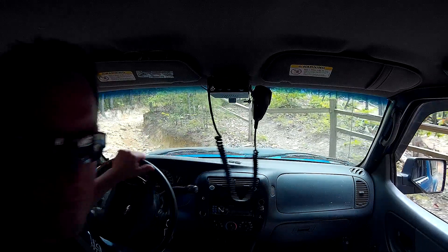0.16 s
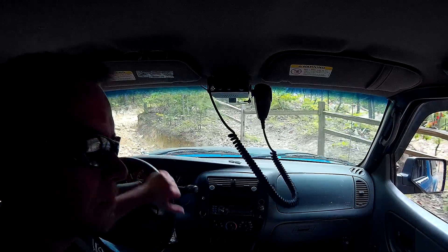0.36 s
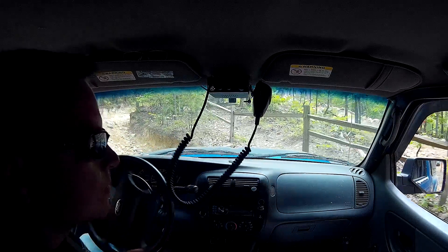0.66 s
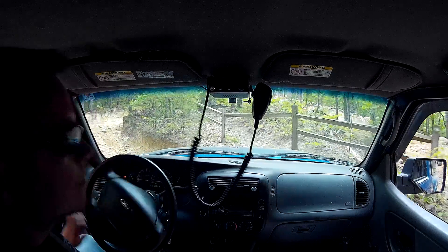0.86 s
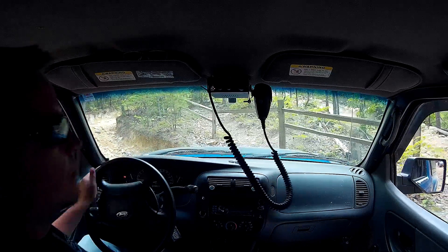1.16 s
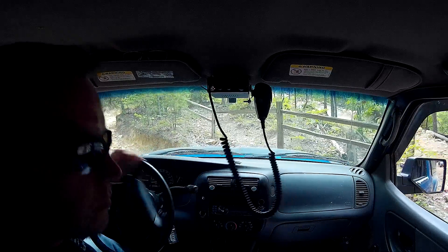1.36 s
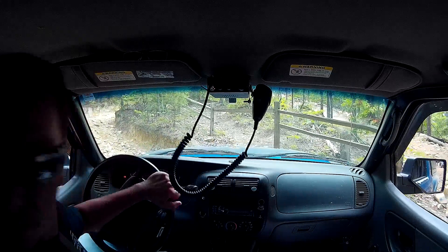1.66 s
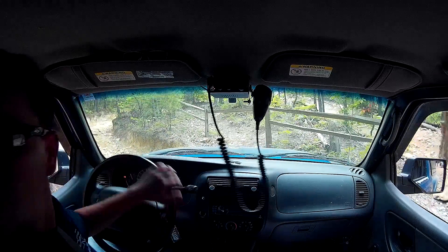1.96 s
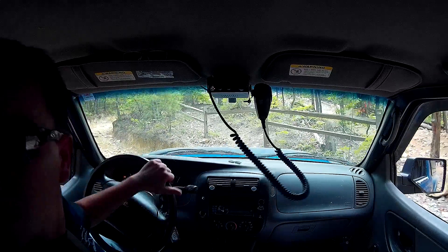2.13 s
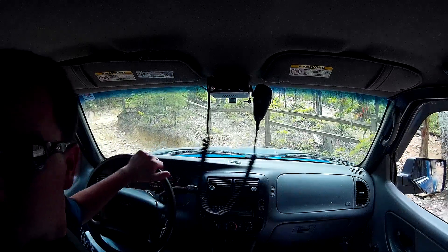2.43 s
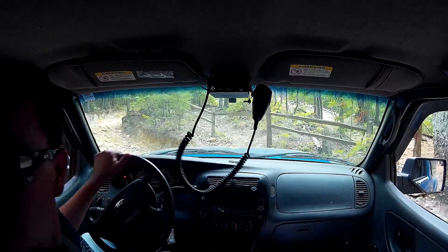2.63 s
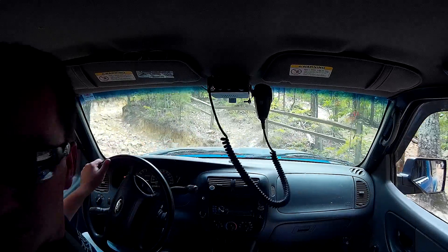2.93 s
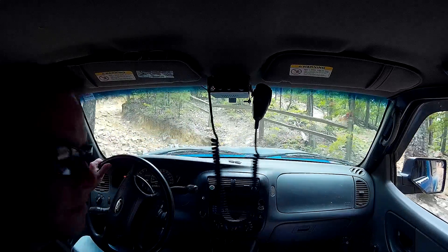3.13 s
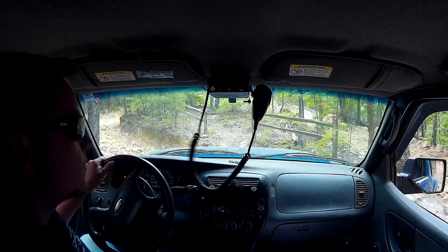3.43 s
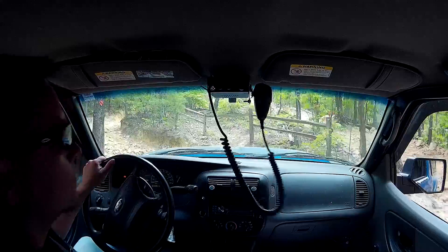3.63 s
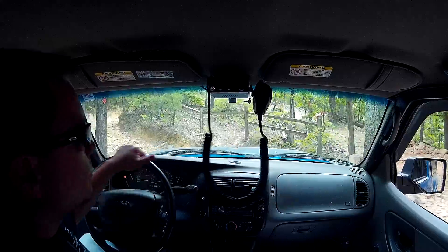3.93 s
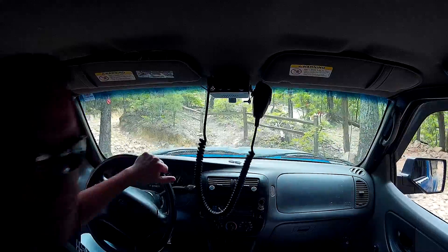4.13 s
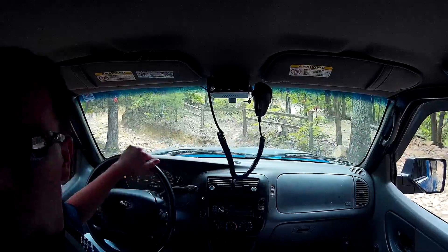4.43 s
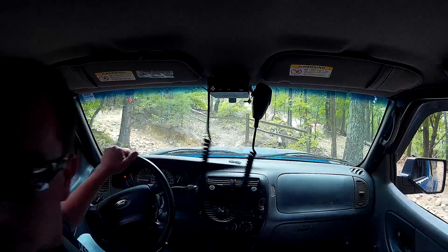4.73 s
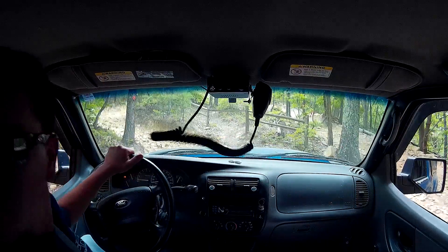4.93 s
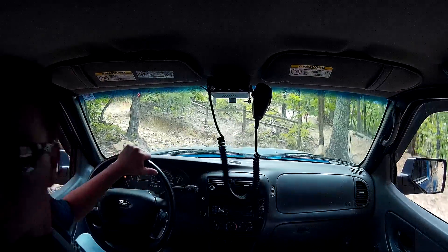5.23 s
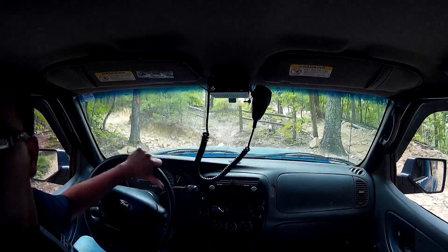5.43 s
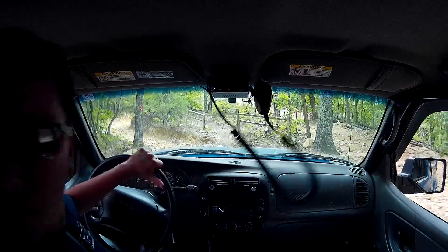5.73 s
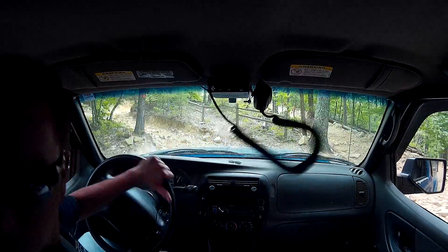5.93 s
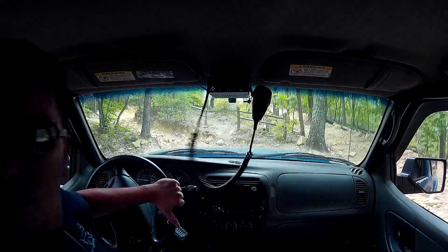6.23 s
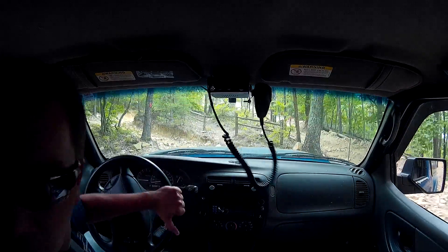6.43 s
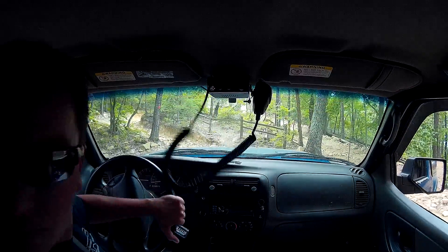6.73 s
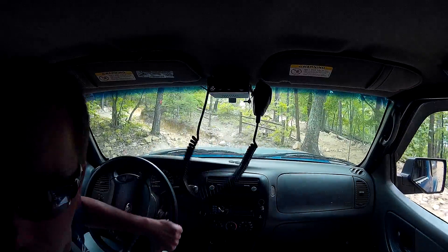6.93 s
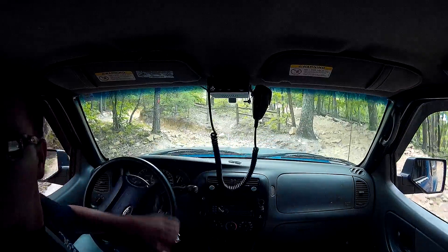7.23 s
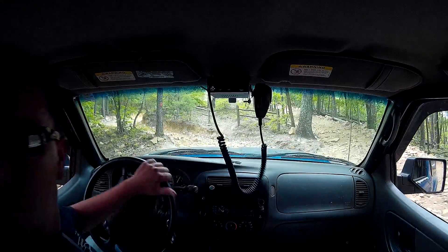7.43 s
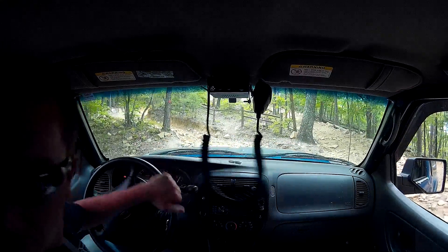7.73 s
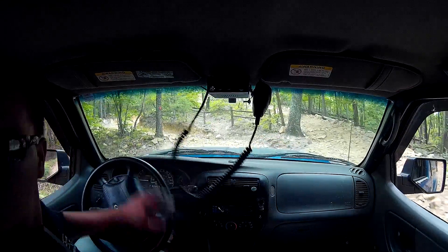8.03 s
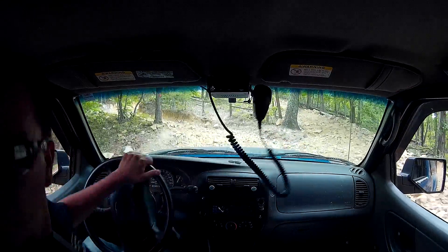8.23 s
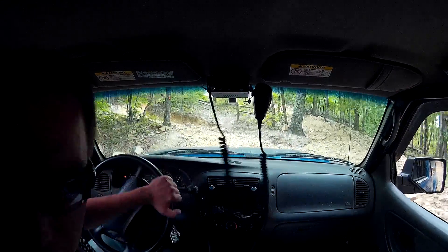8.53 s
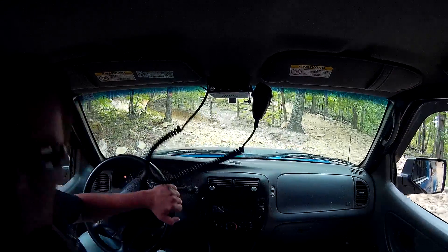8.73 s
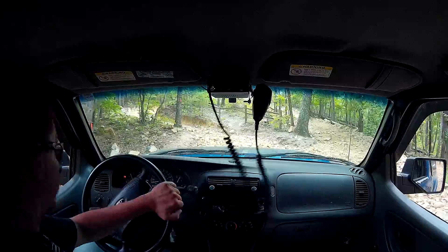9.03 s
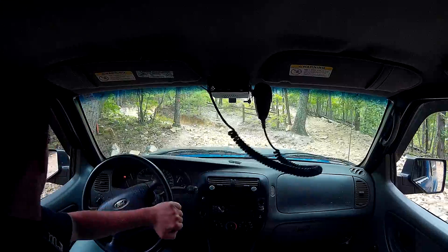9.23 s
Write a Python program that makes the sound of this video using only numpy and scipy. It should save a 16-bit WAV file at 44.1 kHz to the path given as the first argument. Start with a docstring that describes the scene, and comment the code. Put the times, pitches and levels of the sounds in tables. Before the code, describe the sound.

From a microphone inside a small truck cab: steady, humming engine at low revs, muffled gravel grinding in surges, and low body sway. Irregular hollow stone pops and boomy suspension knocks come through the floor, while crisp plastic ticks, snaps, small squeaks and a soft hiss sound nearer. Early seconds are milder; clusters of hard blows arrive midway and again late, then crunching continues to the end.

```python
"""A six-cylinder engine turns low and steady in the cab of a pickup crawling up a rocky trail.
Its drone is a stack of sines; under it filtered noise makes tyre rumble, body sway and grinding grit.
Stones pop and the suspension thumps as short dying rings. Loose trim clacks as filtered snaps,
a metal fitting jingles through its ringing tones, panels squeak in narrow bands of noise,
and a soft hiss carries fine ticks and a thin whistle."""
import sys
import numpy as np
from scipy import signal
from scipy.fft import rfft, irfft, next_fast_len
from scipy.io import wavfile
from scipy.ndimage import uniform_filter1d, minimum_filter1d, map_coordinates

SR = 44100
rng = np.random.default_rng(int(sys.argv[2]) if len(sys.argv) > 2 else 0)


def generate_wav(signal):
    """Clip the signal to [-1, 1] and save it as 16-bit WAV at the path in sys.argv[1]."""
    frames = np.transpose(np.atleast_2d(signal))
    scaled = np.clip(frames, -1, 1) * 32767
    pcm = np.round(scaled).astype(np.int16)
    wavfile.write(sys.argv[1], SR, pcm)


N = 413216  # length in samples
USUAL_LOAD_DB = -33.5  # grinding level on an ordinary stretch; load_db is counted from here


def amp(db):
    """Turn decibels into a gain."""
    return 10 ** (np.asarray(db) / 20)


def unit(x):
    """Scale to an rms of 1."""
    return x / np.sqrt(np.mean(x ** 2) + 1e-20)


def along(points, hz):
    """Read (pitch_hz, value) points at any pitch, on a log axis."""
    f, v = np.transpose(points)
    return np.interp(np.log(hz + 1), np.log(f + 1), v)


def curves(rows):
    """Turn each column after the time into a curve with one value per sample."""
    s, *cols = np.transpose(rows)
    return [np.interp(np.arange(N) / SR, s, c) for c in cols]


def wobble(rate):
    """A smooth random curve through `rate` random points a second."""
    points = rng.standard_normal(int(N * rate / SR) + 4)
    return map_coordinates(points, [np.arange(N) * rate / SR])


def coloured(x, spectrum):
    """Filter x to the given (pitch_hz, level_db) curve, with no sound before its cause."""
    m = 2 * next_fast_len(len(x))
    level = amp(along(spectrum, np.fft.rfftfreq(m, 1 / SR)))
    # folding the cepstrum forward gives the minimum-phase filter
    cepstrum = irfft(np.log(level))
    cepstrum[1:m // 2] *= 2
    cepstrum[m // 2 + 1:] = 0
    return irfft(rfft(x, m) * np.exp(rfft(cepstrum)))[:len(x)]


def add(track, s, sound):
    """Mix a sound into the track, starting at s seconds."""
    start = int(np.clip(s * SR, 0, N - 1))
    track[start:start + len(sound)] += sound[:N - start]


def contacts(rate, spread_db):
    """Random small blows of unequal size and either sign, `rate` a second; rms 1."""
    size = amp(spread_db * np.minimum(rng.standard_exponential(N), np.pi))
    return unit((rng.random(N) < rate / SR) * size * rng.choice([-1, 1], N))


# how long the cab's reflections last: pitch_hz, time_to_fall_60_db_s
CAB_REFLECTIONS = [(100, 0.1), (500, 0.038), (2000, 0.055), (12000, 0.035)]


def in_cab(sound, wet_db):
    """Walls throw a blow back as a short noisy tail that dies at its own pace in each band; peak 1."""
    hz, t, z = signal.stft(rng.standard_normal(SR // 6), SR, nperseg=128)
    decay = amp(-60 * t / along(CAB_REFLECTIONS, hz)[:, None])
    tail = signal.istft(z * decay, SR, nperseg=128)[1]
    tail = np.pad(tail / np.linalg.norm(tail), (SR // 500, 0))  # reflections come 2 ms late
    both = sound + amp(wet_db) * signal.fftconvolve(sound, tail)[:len(sound)]
    return both / np.max(np.abs(both))


# smooth trail between the rocks: grinding_db, tyre_rumble_db, body_sway_db
SMOOTH_TRAIL = (-43, -32.5, -41)
# a wheel climbs a rock and rolls off; rise and fall are times for a change by a factor e:
# crest_s, rise_s, fall_s, grinding_db, tyre_rumble_db, body_sway_db
ROCK_CLIMBS = [(0.291, 0.0306, 0.06, -43.5, -35, -22.5), (0.411, 0.071, 0.052, -33.5, -28.5, -36),
               (0.817, 0.083, 0.18, -29, -20, -19), (1.101, .07, 0.23, -34, -19.5, -26),
               (1.351, 0.097, 0.1, -35, -23.5, -39), (1.669, 0.41, 0.09, -36, -25.5, -27),
               (2.078, .05, 0.12, -33.5, -29, -26.5), (2.481, 0.12, 0.19, -32, -26.5, -24),
               (2.841, 0.06, 0.12, -33.5, -21, -22.5), (3.11, 0.21, 0.15, -30, -22, -24.5),
               (3.67, 0.2, 0.13, -24.5, -18.5, -15), (3.95, 0.058, 0.1, -33, -23, -26),
               (4.331, 0.0966, 0.38, -45.5, -28.5, -27), (4.809, 0.12, 0.13, -30.5, -21, -31),
               (5.009, 0.09, 0.54, -35.5, -23, -25.5), (5.412, .14, 0.086, -24, -19, -22),
               (5.62, 0.21, 0.063, -29, -18.5, -13), (5.861, 0.34, 0.12, -30, -18, -17),
               (6.281, 0.33, 0.17, -32.5, -23.5, -21), (6.539, 0.075, 0.13, -34, -29, -24.5),
               (7.05, 0.075, 0.13, -30, -32, -22.5), (7.331, .1, 0.13, -29, -24.5, -24.5),
               (7.741, 0.081, 0.097, -28.5, -28, -32), (8.11, 0.28, 0.19, -23.5, -15, -18.5),
               (8.42, 0.303, 0.057, -41, -47, -15), (8.721, 0.16, 0.25, -29, -22.5, -25),
               (8.85, 0.081, 0.027, -37, -44, -18), (9.32, 0.31, 0.16, -32, -24.5, -22.5)]
SWAY_LINGERS = 1.97  # the body settles this many times slower than the tyre


def ride():
    """Grinding, rumble and sway in dB: each rock swells and dies away on top of the smooth trail."""
    t = np.arange(0, N + 64, 64) / SR
    power = amp(SMOOTH_TRAIL)[:, None] ** 2 + 0 * t
    for s, rise, fall, *levels in ROCK_CLIMBS:
        settle = fall * np.array([[1], [1], [SWAY_LINGERS]])
        swell = np.exp(-np.maximum((s - t) / rise, (t - s) / settle))
        power = power + (amp(levels)[:, None] * swell) ** 2
    return curves(np.column_stack([t, 10 * np.log10(power.T)]))


# engine speed: time_s, shaft_turns_per_s
ENGINE_SPEED = [(0, 19.3), (2.0, 19.25), (3.8, 19.25), (4.4, 19.8), (5.3, 19.6), (6.0, 19.9), (6.5, 19.6),
                (7.5, 19.45), (8.05, 18.8), (8.8, 19.35), (9.37, 19.45)]
# tones of the drone, before they wobble: multiple_of_shaft_rate, level_db
ENGINE_TONES = [(2, -1), (2.5, -11), (3, 1), (3.5, -10), (4, -1), (5, -11), (6, 1), (7, -4), (9, -15),
                (10, -6), (11, -10), (13, -5), (15, -15), (18, -14)]


def engine():
    """Multiples of the shaft rate boom; three unequal firings a turn add puffs of mechanical noise."""
    turns = np.cumsum(curves(ENGINE_SPEED)[0]) / SR
    drone = np.zeros(N)
    for k, db in ENGINE_TONES:
        cycles = round(2 * k) / 2 * turns + rng.random()
        drone += amp(db + 0.85 * wobble(4)) * np.sin(2 * np.pi * cycles + 0.13 * wobble(5.5))
    firing = (1 + np.cos(2 * np.pi * turns * 3)) * (3 + 2 * np.cos(2 * np.pi * turns))
    puff_spectrum = [(40, -41), (120, -17), (260, -2), (400, -8),
                     (800, -12.5), (2000, -32), (6000, -52), (15000, -63)]
    puffs = unit(firing * coloured(rng.standard_normal(N), puff_spectrum))
    return amp(-33) * drone + amp(-39) * puffs


def lumpy(x, depth_db):
    """Stones of different sizes: each band of x flares on its own for some 20 ms."""
    z = signal.stft(x, nperseg=512)[2]
    field = uniform_filter1d(rng.standard_normal(z.shape), size=5, axis=0)
    field = uniform_filter1d(field, size=4, axis=1)
    return signal.istft(z * amp(depth_db * unit(field)), nperseg=512)[1][:N]


# tone of the body sway: pitch_hz, level_db (per Hz)
SWAY_TONE = [(10, -21), (21, -24.5), (28, 8), (36, 5.5), (50, 3.5), (75, 3), (100, -10), (160, -30),
             (600, -110)]
# tone of the drumming tyres: pitch_hz, level_db (per Hz)
RUMBLE_TONE = [(20, -61), (50, -29), (85, -1), (122, 0), (160, -3.5), (205, -3.5), (300, -7.5), (370, -5),
               (450, -12), (650, -24.5), (1300, -45), (5000, -115)]
# tone of the crushed grit: pitch_hz, level_db (per Hz)
GRIND_TONE = [(60, -46), (200, -37), (420, -2), (720, 4), (1000, -2), (1450, -6), (1950, -19),
              (2700, -19.5), (3200, -32.5), (4400, -35), (6000, -39), (9000, -55), (15000, -79)]


def tyres(grind_db, rumble_db, sway_db):
    """The body sways, the tread drums over rock, and grit is crushed more densely under load."""
    sway = unit(coloured(rng.standard_normal(N), SWAY_TONE))
    # the dampers hold the swings near an even size
    sway = unit(sway / np.sqrt(np.abs(uniform_filter1d(sway ** 2, SR // 12)) + 0.099))
    rumble = unit(coloured(contacts(700, spread_db=3.5) * amp(1.45 * wobble(13)), RUMBLE_TONE))
    crushing = contacts(230 * amp(0.5 * (grind_db - USUAL_LOAD_DB)), spread_db=2)
    grind = unit(coloured(in_cab(crushing, wet_db=-3.5), GRIND_TONE))
    grind = grind + 0.8 * unit(coloured(rng.standard_normal(N), GRIND_TONE))
    grind = unit(lumpy(grind, depth_db=0.5) * amp(1.87 * wobble(45)))
    return amp(sway_db) * sway + amp(rumble_db) * rumble + amp(grind_db) * grind


# tone of the hiss: pitch_hz, level_db (only the shape counts)
HISS_TONE = [(500, 10), (1800, 18.5), (3200, 14.5), (5000, 13), (6200, 8), (7700, 10.5), (8600, 6),
             (10500, 3.5), (12500, 4.5), (15500, -1.5)]
# soft swells of the hiss, before a slight wobble: middle_s, lift_db, half_length_s
HISS_SWISHES = [(0.427, 2.5, 0.13), (0.78, 4, 0.11), (1.362, 1.5, 0.21), (1.682, 3, 0.12),
                (2.604, 6.5, 0.12), (3.461, 4, 0.24), (4.295, 7.5, 0.036), (7.81, 4, 0.29),
                (9.016, 4.5, 0.15)]
HISS_DB, HISS_GROWS = -53.5, 0.2  # level at an ordinary load; dB gained per dB of load
WHISTLE_HZ, WHISTLE_FLUTTER_HZ = 7933, 30.5  # middle pitch; flutters a second


def air(load_db):
    """A soft, ticking hiss swishes and a thin whistle flutters; both grow a little with the load."""
    t = np.arange(N) / SR
    ticks = contacts(24, spread_db=-2.5)
    hiss = unit(coloured(rng.standard_normal(N) + 0.3 * ticks, HISS_TONE))
    flutter = 1 + np.cos(2 * np.pi * WHISTLE_FLUTTER_HZ * t + 0.5 * wobble(8))
    whistle_cycles = np.cumsum(WHISTLE_HZ + 5 * wobble(20)) / SR
    whistle = amp(-17) * unit(flutter * np.sin(2 * np.pi * whistle_cycles))
    swish_db = sum(db * np.exp(-((t - s) / half) ** 2) for s, db, half in HISS_SWISHES)
    swish_db = swish_db * (1 + 0.2 * wobble(40))
    return amp(HISS_DB + HISS_GROWS * load_db) * (amp(swish_db) * hiss + whistle)


GRIT_PER_S, GRIT_DB = 90, -39  # typical rate and level at an ordinary load
GRIT_HZ, GRIT_OCTAVES = 1716, 0.82  # middle pitch and its spread
GRIT_CYCLES, GRIT_DULLING_DB = 35.5, 10.5  # typical cycles to fall 60 dB; loss per octave upward


def grit(load_db):
    """Gravel cracks in little bunches: a few cycles each, own pitch, more and louder under load."""
    rate = GRIT_PER_S * amp(0.5 * load_db + 5 * wobble(16))
    at = np.flatnonzero(rng.random(N) < rate / SR)
    pitch, life, size = rng.standard_normal((3, N))[:, at, None]
    hz = np.clip(GRIT_HZ * 2 ** (GRIT_OCTAVES * pitch), 500, 9000)
    t = np.arange(SR // 50) / SR
    cycles = hz * t
    db = GRIT_DB + 0.59 * load_db[at, None] + 4 * np.minimum(size, 2)
    db = db - GRIT_DULLING_DB * np.log2(np.maximum(hz / GRIT_HZ, 0.5))
    decay = amp(db - 60 * cycles / (GRIT_CYCLES * 2 ** (0.5 * life)))
    grains = decay * np.sin(2 * np.pi * cycles) * (1 - np.exp(-2 * cycles))
    # drop every grain into place and sum the overlaps
    places = at[:, None] + np.arange(len(t))
    return np.bincount(places.ravel(), grains.ravel(), N)[:N]


# tone of the hard plastic trim: pitch_hz, level_db
TRIM_TONE = [(200, -66), (900, 14.5), (1600, 11.5), (2800, 8), (3400, -1), (4100, -1.5), (4650, -2.5),
             (5300, -8.5), (5900, -8), (6450, -8.5), (7700, -12), (9500, -23), (11700, -20.5), (14000, -31)]
# ringing tones of the metal fitting: pitch_hz, level_db, time_to_fall_60_db_s
METAL_TONES = [(2902, -4, .13), (3472, -8, .05), (3690, 0, .08), (3800, -4, .05), (3942, -5, .06),
               (4377, -9, .08), (5030, -13, .05), (5770, -20, .05), (6298, -16, .05), (6869, -21, .06),
               (7670, -19, .05)]


def rattle(load_db):
    """Loose parts tick and the metal fitting trembles, more often and harder on rough ground."""
    shake, t = amp(load_db), np.arange(SR // 8) / SR
    ticks = coloured(in_cab(contacts(34 * shake, spread_db=3.5), wet_db=1.5), TRIM_TONE)
    ring = sum(amp(db - 60 * t / t60) * np.sin(2 * np.pi * hz * t) for hz, db, t60 in METAL_TONES)
    tremble = signal.fftconvolve(contacts(45 * shake, spread_db=3), ring)[:N]
    return shake ** 0.5 * (amp(-49.5) * unit(ticks) + amp(-59.5) * unit(tremble))


def stone_pop(hz, t60):
    """A stone slips and strikes its neighbour: a crack, a short ring and a faint scrape; peak 1."""
    t = np.arange(SR // 6) / SR
    ring = np.sin(2 * np.pi * hz * t) - 0.5 * np.sin(2 * np.pi * 1.43 * hz * t)
    ring = ring * amp(-60 * t / t60) * (1 - np.exp(-t / 0.0003))
    crack = amp(-60 * t / 0.006)
    burst = rng.standard_normal(len(t)) * (crack + amp(-12) * amp(-18 * t / t60))
    spectrum = [(hz / 5, -25), (hz * 0.7, -3), (hz * 1.4, 0), (hz * 3, -9), (hz * 8, -35)]
    scrape = coloured(burst, spectrum)
    return in_cab(ring + 0.7 * scrape / np.max(np.abs(scrape)), wet_db=-12)


# stones pop under the tread; level is the peak before the floor dulls it:
# start_s, level_db, pitch_hz, time_to_fall_60_db_s
STONE_POPS = [(0.914, -16, 1260, 0.028), (0.928, -19, 795, 0.067), (0.981, -13, 710, 0.042),
              (1.174, -14.5, 1010, 0.034), (1.187, -9.5, 650, 0.037), (1.348, -21, 733, 0.11),
              (2.012, -15, 720, 0.028), (2.478, -16, 767, 0.095), (3.003, -14.5, 948, 0.023),
              (3.051, -10, 632, 0.028), (3.539, -8, 960, 0.036), (3.604, -12, 783, .03),
              (3.624, -10, 710, .025), (3.641, -3.5, 853, 0.024), (3.669, -12, 1314, .02),
              (3.699, -13, 837, 0.039), (3.87, -11.5, 755, 0.03), (4.212, -16, 604, 0.026),
              (4.391, -15, 740, 0.027), (4.674, -23, 755, .035), (5.151, -11.5, 1405, 0.012),
              (5.228, -17, 635, 0.033), (5.337, -19, 700, 0.039), (5.35, -10.5, 1460, 0.018),
              (5.372, -9, 920, 0.033), (5.448, -7, 684, 0.018), (5.803, -18, 760, 0.035),
              (5.826, -11, 850, 0.044), (5.907, -21, 651, 0.015), (6.068, -17, 700, 0.025),
              (6.142, -17, 985, 0.014), (6.385, -4.5, 872, 0.022), (6.43, -19.5, 625, 0.02),
              (6.476, -22, 810, 0.046), (6.531, -14.5, 1390, .03), (6.759, -23, 1214, 0.045),
              (7.016, -15, 799, 0.033), (7.268, -16.5, 600, 0.056), (7.303, -21, 628, 0.028),
              (7.348, -12, 714, 0.023), (7.425, -15, 920, 0.039), (7.705, -17, 619, 0.03),
              (7.738, -25, 797, 0.034), (7.973, -9.5, 780, 0.023), (8.06, -11, 1320, 0.018),
              (8.107, -25, 900, 0.016), (8.125, -19, 1596, 0.045), (8.199, -9, 1100, .02),
              (8.247, -7, 1020, 0.017), (8.333, -12, 895, 0.017), (8.511, -6.5, 948, 0.024),
              (8.621, -19, 875, 0.021), (8.71, -19, 719, 0.017), (8.753, -16, 847, 0.022),
              (8.873, -14, 990, 0.025), (8.995, -16, 725, 0.031), (9.021, -12.5, 599, 0.034),
              (9.164, -20, 808, 0.023)]
# what the floor lets through: pitch_hz, level_db
FLOOR_TONE = [(1500, -2), (2600, -14.5), (4000, -18), (8000, -27), (15000, -52)]
# small stones between the big ones: rate and middle level (before the floor) at an ordinary load
PEBBLES_PER_S, PEBBLE_DB, PEBBLE_HZ = 12, -26, 923  # the last is their middle pitch


def stones(load_db):
    """Big stones pop singly, pebbles at random and more often under load; the floor dulls them all."""
    out = np.zeros(N)
    for s, db, hz, t60 in STONE_POPS:
        add(out, s, amp(db) * stone_pop(hz, t60))
    # running count of pebbles due so far; one falls at random within each whole count
    expected = np.cumsum(PEBBLES_PER_S * amp(0.5 * load_db)) / SR
    for k, (when, size, pitch) in enumerate(rng.random((int(expected[-1]), 3))):
        at = np.searchsorted(expected, k + when)
        db = PEBBLE_DB + 0.42 * load_db[at] + 6 * (size - 0.5)
        hz = PEBBLE_HZ * 2 ** (2.1 * (pitch - 0.5))
        add(out, at / SR, amp(db) * stone_pop(hz, t60=0.049))
    return coloured(out, FLOOR_TONE)


# panels rub and squeak; level is the rms at the middle of the swell:
# start_s, level_db, pitch_hz, length_s
PANEL_SQUEAKS = [(0.33, -59, 6550, 0.23), (1.413, -43.5, 2180, 0.075), (3.098, -45, 4860, 0.055),
                 (3.957, -46, 2250, 0.063), (5.801, -42, 1240, 0.071), (8.488, -45, 3870, 0.045),
                 (8.522, -52, 3830, 0.048)]


def squeaks():
    """Rubbing panels stick and slip unevenly: a hoarse, narrow band that swells and fades."""
    out = np.zeros(N)
    for s, db, hz, length in PANEL_SQUEAKS:
        count = int(length * SR)
        band = [(hz / 4, -60), (hz * 0.88, -20), (hz, 0), (hz * 1.12, -20), (hz * 2, -48)]
        rub = unit(coloured(rng.standard_normal(count), band))
        add(out, s, amp(db) * np.hanning(count) * rub)
    return out


# the suspension knocks against a rock; level is the peak:
# start_s, level_db, pitch_hz, time_to_fall_60_db_s
SUSPENSION_THUMPS = [(0.811, -3, 115, 0.11), (0.878, -10, 80, .04), (1.056, -15, 292, 0.066),
                     (1.075, -12, 90, 0.14), (1.275, -19, 347, 0.14), (1.342, -18, 355, 0.11),
                     (2.483, -12, 110.2, 0.065), (2.834, -19, 101, 0.075), (3.051, -7, 570, 0.059),
                     (3.111, -13, 378, 0.15), (3.125, -8, 150, 0.024), (3.154, -13, 85, 0.043),
                     (3.345, -17, 310, 0.08), (3.671, -0.5, 97, 0.083), (3.772, -7, 378, 0.067),
                     (4.807, 0, 125.7, 0.067), (4.822, -6, 189, 0.15), (4.981, -13, 363, 0.07),
                     (5.226, -8.5, 122, 0.069), (5.307, -10, 111.8, .06), (5.382, -11, 334, 0.026),
                     (5.404, -2.5, 118.5, 0.11), (5.418, -3, 122, 0.1), (5.448, 2.5, 94, 0.043),
                     (5.856, -7, 340, 0.048), (5.922, -0.5, 203.5, 0.029), (5.926, -8, 398, 0.027),
                     (6.257, -11.5, 253, .04), (6.275, -7, 106.8, 0.074), (6.301, -13, 370, 0.14),
                     (7.059, -9.5, 95, 0.088), (7.874, -13, 467, 0.14), (8.015, -18, 376, 0.064),
                     (8.081, -11, 171, 0.11), (8.097, -14, 356, 0.083), (8.138, 0.5, 88, 0.16)]


def thumps():
    """Each rock shoves the frame once and sends a short, heavily damped boom through it."""
    out, t = np.zeros(N), np.arange(SR // 4) / SR
    for s, db, hz, t60 in SUSPENSION_THUMPS:
        u = 2 * np.pi * hz * t
        boom = np.sin(u) * amp(-60 * t / t60)
        shove = u * (2 - u) * np.exp(-u)
        shudder = unit(coloured(rng.standard_normal(len(t)), RUMBLE_TONE)) * amp(-30 * t / t60)
        onset = 1 - np.exp(-t / 0.00029)
        knock = (boom + 0.71 * shove + 0.34 * shudder) * onset
        add(out, s, amp(db) * in_cab(knock, wet_db=-11.5))
    return out


# loose trim clacks; level is the peak, lifts reshape the trim's tone, only negative high lifts dull:
# start_s, level_db, low_ring_lift_db, main_ring_lift_db, high_snap_lift_db, time_to_fall_60_db_s
TRIM_CLACKS = [(0.913, -24.5, -1, -2, -14, 0.018), (1.157, -26, -2, -4, 7, 0.011),
               (2.072, -24.5, -4, -2, 4, 0.018), (2.477, -29, 2, -5, -14, 0.024),
               (2.982, -19, 4, 18, -5, 0.016), (3.049, -18, -4, 0, -2, 0.019),
               (3.191, -30, 3, -3, -14, 0.02), (3.296, -21.5, -9, 4, -1, .012),
               (3.491, -26, -11, -9, -12, 0.02), (3.872, -21, 1, -7, -10, 0.018),
               (4.215, -27.5, 4, -3, -10, .014), (4.801, -20.5, 1, 3, -14.5, 0.0072),
               (4.812, -26.5, -14, 12, -15, 0.007), (5.023, -34, -13, -4, 9, .012),
               (5.149, -15, 0, 18, -12, 0.0067), (5.17, -10.5, -9.5, 12, 0.5, 0.013),
               (5.295, -24.5, -4, 14, -17, 0.013), (5.344, -25, -5, 14, -18, 0.0084),
               (5.35, -12, 0.5, 11, -14, 0.011), (5.371, -15, -4.5, -4, -3, .014),
               (5.436, -16, 1, -2, -14, .016), (5.665, -30, -12, -11, 4, .014),
               (5.927, -15, 1, 10, -20, 0.0079), (5.943, -13, -9.5, 19, 5, 0.0063),
               (6.035, -26, -11, 9, -2, 0.0099), (6.095, -23, 6, -3, -14, 0.013),
               (6.473, -25, 5, -4, -10, 0.034), (6.529, -23, 1, 1, 1, .022),
               (6.64, -29, -4, -8, -12, 0.018), (7.016, -11.5, -4, 0, -1, 0.022),
               (7.037, -19, -10, -14, -3, 0.021), (7.144, -32, -14, -4, 10, 0.017),
               (7.961, -19, -4, -1, -22, 0.008), (7.975, -24, 7, -4, -14, .012),
               (8.044, -16, -1, -3, -14, 0.012), (8.061, -16, -2, 3, -14, 0.0063),
               (8.189, -11.5, -2, 9, -20, 0.006), (8.216, -11.5, -5, 15, 9, 0.0095),
               (8.249, -21, 3, 2, -20, 0.018), (8.268, -13.5, 6, 18, -31, 0.0081),
               (8.33, -23, -1, -2, 0, .018), (8.652, -24.5, 5, 10, -13, 0.0065),
               (8.665, -26.5, -2, 18, -7, 0.0056), (8.709, -29, -2, 4, -17, 0.0054),
               (8.751, -19, 2, 2, -12, 0.01), (8.874, -13.5, -8, -6, -16, 0.013),
               (8.882, -24, -14, -4, -4, 0.025), (8.923, -24.5, -8, -1, -15, 0.018),
               (8.994, -31.5, -17, -11, 3, 0.02), (9.023, -29.5, -10, -8, -11, 0.094),
               (9.191, -13.5, 6, 3, -29, 0.01), (9.228, -22.5, -8, -6, -13, 0.015)]
# the plastic's rings, and the hollows between them where the share is negative:
# pitch_hz, half_width_hz, share_of_main_ring_lift
PLASTIC_RINGS = [(3300, 250, -0.64), (3800, 330, 0.13), (4660, 440, 0.82), (5960, 320, 0.25),
                 (6530, 240, .6), (8100, 1500, -0.43)]
CHATTER_HOLD = 0.25  # share of the fall time for which the parts keep touching before the fall


def trim():
    """Plastic snaps on plastic and chatters to rest; where it is struck decides which rings stand out."""
    out, t = np.zeros(N), np.arange(SR // 8) / SR
    hz = np.geomspace(200, 15000, 300)
    rings = sum(share * np.exp(-((hz - mid) / width) ** 2) for mid, width, share in PLASTIC_RINGS)
    for s, db, low_db, ring_db, high_db, t60 in TRIM_CLACKS:
        dull_db = min(high_db, 0)  # a softer touch also loses the upper rings
        tilt = [(2900, low_db), (3900, 0), (5000, 0), (7400, 0.6 * dull_db), (9000, high_db)]
        strike = amp(-60 * np.maximum(t - CHATTER_HOLD * t60, 0) / t60)
        rebounds = (rng.random(len(t)) < 350 / SR) * amp(-3 - 11 * t / t60)
        linger = amp(-11) * amp(-20 * t / t60)
        onset = 1 - np.exp(-t / 0.00014)
        snap = rng.choice([-1, 1], len(t)) * (strike + rebounds + linger) * onset
        tone_db = along(TRIM_TONE, hz) + along(tilt, hz) + ring_db * rings
        clack = coloured(snap, np.column_stack([hz, tone_db]))
        add(out, s, amp(db) * in_cab(clack, wet_db=-10))
    return out


# the metal fitting jingles; level is the peak, the chatter falls 60 dB over its length:
# start_s, level_db, chatter_length_s
METAL_JINGLES = [(3.266, -35, 0.047), (3.602, -20, 0.078), (5.252, -29, 0.046), (5.39, -23, 0.069),
                 (5.459, -30, 0.029), (6.274, -24, 0.048), (7.426, -28.5, 0.051), (8.148, -17.5, 0.045),
                 (8.509, -31, 0.14), (8.775, -35, .1), (9.245, -39, .1)]


def fitting():
    """Hard jolts set the loose metal chattering, and every touch rings its tones."""
    out, t = np.zeros(N), np.arange(SR // 4) / SR
    for s, db, length in METAL_JINGLES:
        # the part seats differently each time, which shifts its tones a little
        ring = np.zeros(len(t))
        for hz, level, t60 in METAL_TONES:
            decay = amp(level + rng.normal(0, 2.5) - 60 * t / t60)
            ring += decay * np.sin(2 * np.pi * hz * rng.normal(1, 0.006) * t)
        chatter = rng.standard_normal(len(t)) * amp(-60 * t / length) * (1 - np.exp(-t / 0.0032))
        jingle = unit(signal.fftconvolve(chatter, ring)[:len(t)])
        jingle = jingle + 0.3 * unit(coloured(chatter, TRIM_TONE))
        add(out, s, amp(db) * jingle / np.max(np.abs(jingle)))
    return out


def scene():
    """Add the sounds from outside the cab to those from inside it."""
    grind_db, rumble_db, sway_db = ride()
    load_db = grind_db - USUAL_LOAD_DB
    outside = engine() + tyres(grind_db, rumble_db, sway_db)
    outside = outside + grit(load_db) + stones(load_db) + thumps()
    inside = air(load_db) + rattle(load_db) + squeaks() + trim() + fitting()
    return (outside + inside)[None]


LIMIT, RELEASE_DB_PER_S = 0.56, 13.5  # ceiling (full scale is 1); speed of recovery
LOW_CUT_HZ, TOP_HZ = 24, 15750  # the bass fades out below the first; nothing passes above the second


def record(dry):
    """A gain control ducks at peaks above the ceiling and recovers slowly; then the band is trimmed."""
    over_db = 20 * np.log10(np.maximum(np.abs(dry) / LIMIT, 1))
    recovered_db = RELEASE_DB_PER_S * np.arange(N) / SR
    duck_db = np.maximum.accumulate(over_db + recovered_db, axis=-1) - recovered_db
    # hold and smooth the gain over 5 ms
    gain = minimum_filter1d(amp(-duck_db), size=SR // 200)
    gain = uniform_filter1d(gain, size=SR // 200)
    m = next_fast_len(N + SR // 2)
    hz = np.fft.rfftfreq(m, 1 / SR)
    band = hz ** 4 / np.hypot(hz ** 4, LOW_CUT_HZ ** 4) * (hz < TOP_HZ)
    return irfft(rfft(dry * gain, m) * band, m)[..., :N]


dry = scene()
out = record(dry)
generate_wav(out)
```